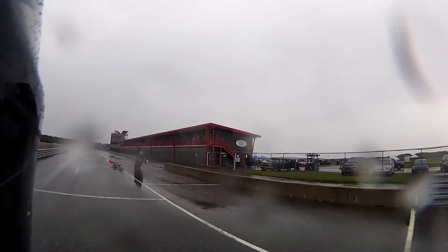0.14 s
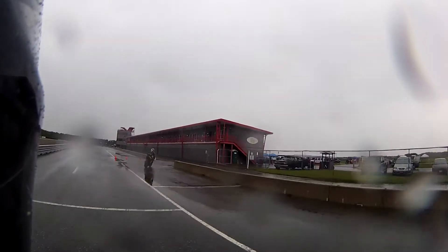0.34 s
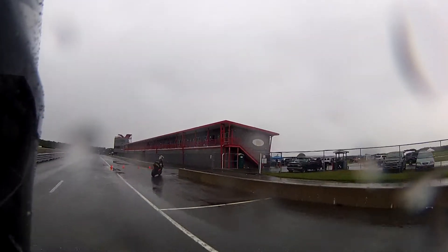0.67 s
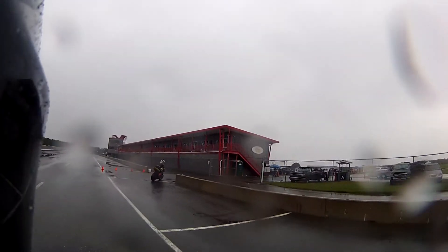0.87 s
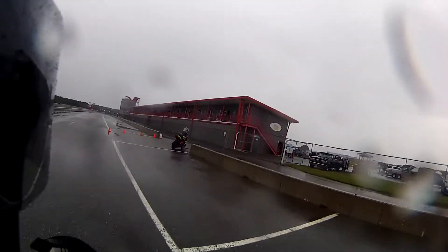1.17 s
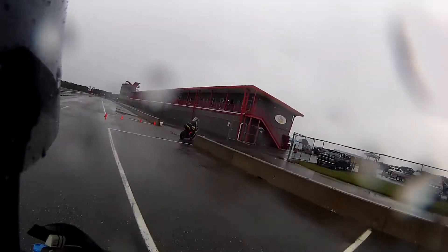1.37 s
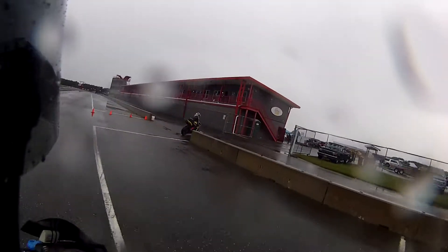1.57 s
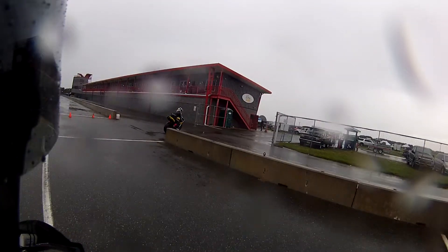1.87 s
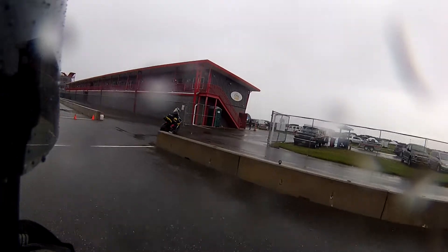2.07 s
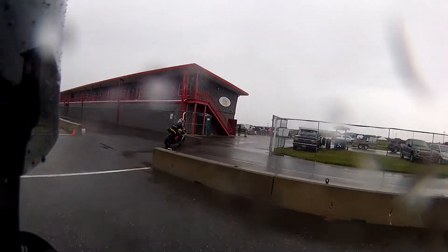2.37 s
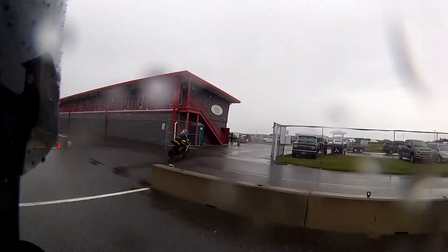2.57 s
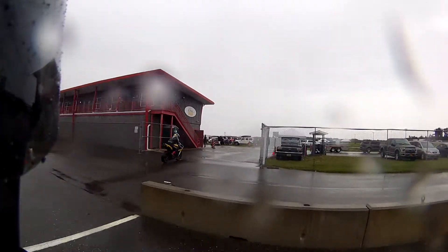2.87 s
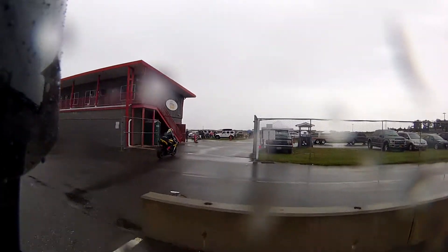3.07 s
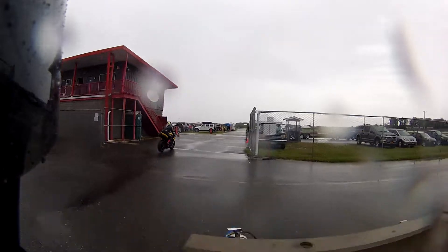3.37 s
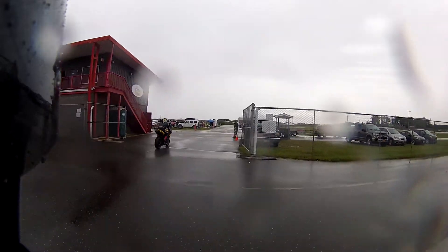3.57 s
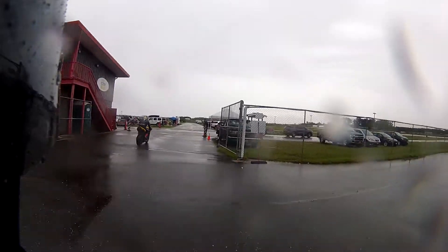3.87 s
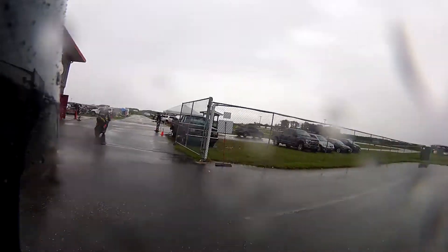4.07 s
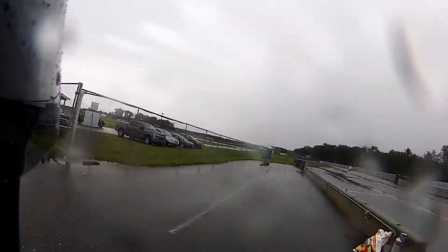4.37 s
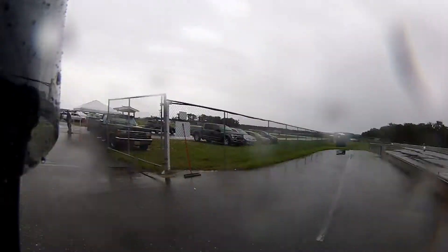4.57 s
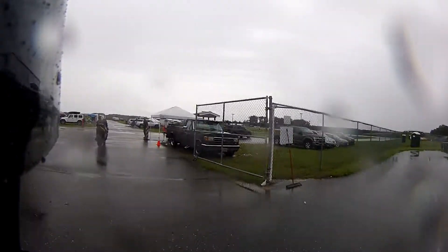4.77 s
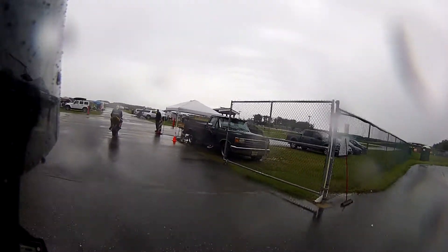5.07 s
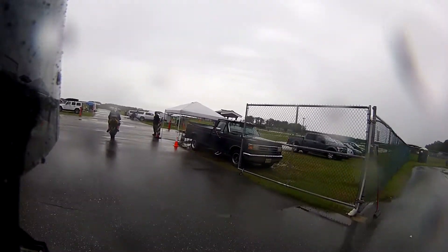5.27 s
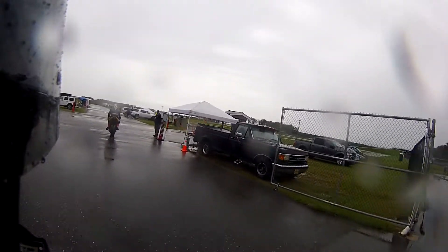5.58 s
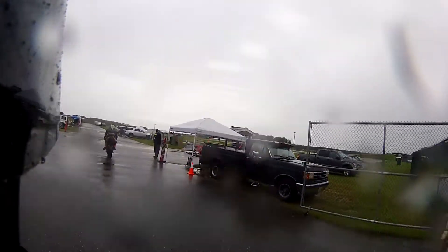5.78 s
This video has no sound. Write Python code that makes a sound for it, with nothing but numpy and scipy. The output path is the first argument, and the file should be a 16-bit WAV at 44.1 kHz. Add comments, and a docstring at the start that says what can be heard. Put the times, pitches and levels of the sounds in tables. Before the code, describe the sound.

A motorcycle engine, heard from on the bike, runs down on a closed throttle as it leaves a wet track. The exhaust pops, gives one loud backfire and crackles briefly, with a faint gear whine behind. The revs sink, two quick throttle blips follow, and the engine then pulls gently at low speed. Light mechanical clatter, wet tyre hiss and a little wind on the microphone lie underneath.

```python
"""A motorcycle engine, heard from on the bike, runs down on a closed throttle as it rolls off a wet track.
Each firing sends a gas pulse through the pipe; the engine is blipped twice and then pulls gently.
Unburnt fuel pops and cracks in the exhaust; gear whines and a late exhaust harmonic are sines locked
to the firings. Valve clatter, ticks of grit, tyre hiss and a little wind, mostly filtered noise, lie under."""
import sys
import numpy as np
from scipy import signal
from scipy.fft import rfft, irfft
from scipy.io import wavfile

SR = 44100
rng = np.random.default_rng(int(sys.argv[2]) if len(sys.argv) > 2 else 0)


def unload_wav(signal):
    """Save mono or channel-first audio to the path in sys.argv[1] as 16-bit WAV at rate SR, clipped to [-1, 1]."""
    wavfile.write(
        sys.argv[1],
        SR,
        np.round(np.clip(np.atleast_2d(signal).T, -1, 1) * 32767).astype(np.int16),
    )


N = 261940
TIME = np.arange(N) / SR
CUTOFF_HZ = 12900
CRUISE_HZ = 60  # firing rate that counts as cruising

# Engine running down in gear, dropping with the clutch in, then following the throttle:
# (time [s], firing rate [Hz])
FIRING_RATE = [(0, 89.52), (.75, 80.32), (1.05, 75.54), (2.42, 57.87), (2.8, 41.03), (2.97, 62),
               (3.05, 63.47), (3.18, 104.1), (3.45, 74.32), (3.8, 46.88), (4.01, 61.5), (4.16, 65.43),
               (4.37, 60.24), (4.75, 63.95), (4.93, 61.72), (5.06, 66.06), (5.27, 62.2), (5.43, 66.2),
               (5.65, 53.1), (5.94, 46.55)]
# Twists of the throttle, two blips and then gentle pulls: (time [s], attack [s], hold [s], release [s],
# thump level before trim [dB], hard edge level at cruising revs before trim [dB])
THROTTLE_TWISTS = [(2.869, .025, 0.088, 0.022, -50, -56.5), (3.057, 0.042, 0.068, 0.04, -44, -51.5),
                   (3.797, 0.025, .25, 0.33, -52, -61), (4.376, 0.24, 0.1, 0.29, -56, -53.5),
                   (5.021, .05, 0.041, 0.089, -53.5, -63), (5.248, 0.092, .08, 0.028, -53.5, -60.5)]
# Tone of the hard edge on a shut throttle: (frequency [Hz], relative level per Hz [dB])
SHUT_EDGE_SPECTRUM = [(60, -40), (200, -14), (340, 7.5), (430, 1), (510, 3.5), (590, 8), (700, -16),
                      (800, -7.5), (880, -17), (980, -10.5), (1200, -22), (1500, -63), (4000, -79)]
# Hiss and clatter swell with the big blip; clatter alone swells again during the pull:
# (time [s], attack [s], hold [s], release [s], clatter level [dB], hiss level [dB])
NOISE_SWELLS = [(3.07, 0.058, 0.23, 0.24, -66, -69), (4.7, .3, 0.018, 0.81, -64, -95)]


def amp(db):
    """Decibels to gain."""
    return 10 ** (np.asarray(db) / 20)


def unit(x):
    """Scales to rms 1."""
    return x / np.sqrt(np.mean(x ** 2) + 1e-20)


def curve(rows, axis=1):
    """One column of a time table, at every sample."""
    rows = np.asarray(rows)
    return np.interp(TIME, rows[:, 0], rows[:, axis])


def swell(s, attack_s, hold_s, release_s, db=0):
    """Envelope that rises, holds at db and dies away."""
    t = TIME - s
    rise = np.clip(t / attack_s, 0, 1)
    fall = np.exp(-np.maximum(t - attack_s - hold_s, 0) / release_s)
    return amp(db) * rise * fall


def together(*levels):
    """Levels add by their power."""
    return np.sqrt(sum(level ** 2 for level in levels))


def wander(rate_hz):
    """Slow random motion of rms 1."""
    hz = np.fft.rfftfreq(N, 1 / SR)
    slow = rfft(rng.standard_normal(N)) * np.exp(-(hz / rate_hz) ** 2)
    return unit(irfft(slow, N))


def colour(x, spectrum):
    """Causal filter with the given spectrum: rings after a click, never before."""
    hz, db = np.transpose(spectrum)
    grid = np.fft.rfftfreq(4096, 1 / SR)
    level_db = np.interp(np.log(grid + 1), np.log(hz), db)
    # folding the cepstrum gives minimum phase
    cepstrum = irfft(np.log(amp(level_db)))
    half = len(cepstrum) // 2
    cepstrum[1:half] *= 2
    cepstrum[half + 1:] = 0
    response = irfft(np.exp(rfft(cepstrum)))
    return signal.oaconvolve(x, response)[:len(x)]


def noise(spectrum):
    """Coloured noise of rms 1."""
    return unit(colour(rng.standard_normal(N), spectrum))


def add(mix, s, sound):
    """Mixes a sound in at time s."""
    part = mix[round(s * SR):][:len(sound)]
    part += sound[:len(part)]


def exhaust(turns, thump_db=-1, shut_db=-0.5, open_db=-3.5, edge_uneven_db=2.3, limp=0.037,
            rush_db=-15, rasp_db=-13, shut_rasp_db=-3):
    """One gas pulse per firing with a rush behind it; the burn is ragged on a shut throttle and near idle."""
    # tones: (frequency [Hz], relative level per Hz [dB])
    thump_spectrum = [(30, -26), (100, 0), (150, 4), (190, 8), (240, 1.5), (320, 4.5), (420, 6.5),
                      (700, -9), (3000, -45.5)]
    open_edge_spectrum = [(60, -74.5), (200, 7.5), (340, 5), (400, 7.5), (490, 1.5), (560, 8), (660, 1),
                          (800, 4.5), (880, -12), (980, -14.5), (1180, -18.5), (1400, -20.5), (2000, -26),
                          (4000, -42)]
    # ragged burn on the shut throttle, sputtering out after the big backfire:
    # (time [s], thump level before trim [dB], edge level before trim [dB])
    ragged_burn = [(0, -42, -49.5), (.55, -43.5, -49.5), (.9, -42, -54), (1.04, -53.5, -54),
                   (1.4, -57, -69.5), (1.53, -52, -57.5), (1.7, -66, -86), (2.0, -78, -67),
                   (2.25, -80, -87)]

    at = np.flatnonzero(np.diff(np.floor(turns)))
    size, edge, late = rng.standard_normal((3, len(at)))
    ragged = (1 - .85 * throttle()[at]) * (1 + 2.5 * np.maximum(-revs()[at], 0))
    size_db = 1.8 * ragged * size
    late_s = .0004 * ragged * late
    # every other firing is a little stronger; the root evens out the power as the rate changes
    strength = amp(size_db) * (1 + limp * (-1) ** np.arange(len(at))) / np.sqrt(curve(FIRING_RATE)[at])
    at = np.clip(at + (late_s * SR).astype(int), 0, N - 1)
    soft, hard = np.zeros((2, N))
    soft[at] = strength
    hard[at] = strength * amp(edge_uneven_db * ragged * edge)

    rush = unit(np.exp(-(turns % 1) / 3.0) * rng.standard_normal(N))  # decays after each firing
    # suction follows each front
    slugs = -pipe(unit(soft) + amp(rush_db) * rush, width_s=0.0012, echo=0.037, lag_s=0.0019)
    push, bite = effort()
    thump_level = amp(thump_db) * together(push, amp(curve(ragged_burn)))
    thump = unit(colour(slugs, thump_spectrum)) * thump_level
    shut_level = amp(curve(ragged_burn, axis=2) + shut_db)
    shut = shut_level * unit(colour(unit(hard) + amp(shut_rasp_db) * rush, SHUT_EDGE_SPECTRUM))
    wide = bite * amp(open_db) * unit(colour(unit(hard) + amp(rasp_db) * rush, open_edge_spectrum))
    return thump + shut + wide


def pipe(x, width_s, echo, lag_s=0., round_trip_s=0.00469, size=1024):
    """Each gas slug leaves as a rounded pulse, and again after a round trip in the pipe."""
    t = np.arange(-size, size + 1) / SR - lag_s
    first = (t / width_s) ** 2
    second = ((t - round_trip_s) / width_s) ** 2
    pulse = (1 - first) * np.exp(-first / 2) + echo * (1 - second) * np.exp(-second / 2)
    return signal.oaconvolve(x, pulse, "same")


def effort(idle_db=-62, pumping_db=-63, pumping_db_per_octave=21, idle_edge_db=-71, edge_db_per_octave=14):
    """Strength of the thump and of its edge: idling, growing with the revs, and pushed up by each twist."""
    octaves = revs()
    twists = [(swell(*shape), thump_db, edge_db) for *shape, thump_db, edge_db in THROTTLE_TWISTS]
    pumping = amp(pumping_db + pumping_db_per_octave * octaves)
    thump = together(amp(idle_db), pumping, *(grip * amp(db) for grip, db, _ in twists))
    edge = together(amp(idle_edge_db), *(grip * amp(db) for grip, _, db in twists))
    return thump, edge * amp(edge_db_per_octave * octaves)


def throttle():
    """Opening of the throttle, 0-1."""
    return np.minimum(sum(swell(*shape) for *shape, _, _ in THROTTLE_TWISTS), 1)


def revs():
    """Engine speed in octaves above cruising."""
    return np.log2(curve(FIRING_RATE) / CRUISE_HZ)


def taut():
    """1 while the drive is under load, 0 once it has gone slack."""
    # (time it starts to slacken [s], time it is loose [s])
    slackening = (0.59, 1.43)
    return np.interp(TIME, slackening, [1, 0])


def drone(turns, level_db=-62.0, db_per_octave=11, open_db=-12, taut_db=1, lag=0.12):
    """Mean flow in the pipe pulsates once per firing; stronger off the throttle, lumpy on a slack drive."""
    load = taut()
    flow = -np.cos(2 * np.pi * (turns - lag) + .2 * wander(20))
    waver_db = (3.2 - 2.2 * load) * wander(12)
    return unit(flow) * amp(level_db + db_per_octave * revs() + open_db * throttle() + taut_db * load + waver_db)


def afterfire(bang_decay_s=0.0032, bang_db=-6, crack_db=-6, thud_db=-1,
              boom=0.31, boom_hz=75, boom_decay_s=0.0084, front_db=13,
              knock_db=-9, knock_hz=135, knock_decay_s=0.024):
    """Unburnt fuel goes off in the hot pipe: a round thud with a steep front and a crack on top."""
    # afterfire pops: (time [s], thud pulse level [dB], crack level before trim [dB])
    pops = [(0.1204, -31, -63), (0.426, -31.5, -54), (0.5312, -26.5, -56), (.642, -25.5, -49),
            (0.822, -44, -51), (0.87, -28, -46), (.897, -31, -44.5), (0.9577, -10.5, -17.5),
            (0.9734, -28, -37.5), (0.988, -33, -44), (1.014, -34.5, -43.5), (1.987, -46.5, -76),
            (2.938, -44.5, -66)]
    # sharp cracks in the silencer:
    # (time [s], crack level before trim [dB], decay [s], thud level before trim [dB])
    silencer_cracks = [(1.202, -35.5, 0.0077, -29.5), (1.21, -24.5, 0.003, -32),
                       (1.216, -24.5, 0.006, -32.5), (1.222, -53, 0.0045, -29), (1.2467, -18, 0.0025, -36),
                       (1.253, -45, 0.018, -35), (1.264, -37, 0.0058, -35.5), (1.317, -36, 0.0053, -38),
                       (1.324, -35, .005, -34), (1.463, -51, 0.025, -52), (1.524, -47.5, 0.0098, -41),
                       (1.566, -37.5, 0.015, -53), (1.579, -57, 0.0028, -36), (1.771, -46, 0.0042, -44.5)]
    # tones of the two: (frequency [Hz], relative level per Hz [dB])
    bang_spectrum = [(100, -9), (400, -1), (600, 12.5), (1000, -3), (1450, -6), (1720, 1), (2500, -4),
                     (2850, -20), (3300, -6.5), (3900, -28), (4500, -12), (5600, -14), (7500, -24),
                     (14000, -34)]
    crack_spectrum = [(100, 0.5), (350, -2), (600, 4), (930, -10), (1050, -0.5), (1400, -12), (1750, 2.5),
                      (2200, -10), (2550, -5.5), (2900, -17.5), (3200, -15.5), (3700, -27), (5600, -30),
                      (8000, -36), (14000, -46)]

    slugs, rattle = np.zeros((2, N))
    t = TIME[:SR // 10]
    knock = np.sin(2 * np.pi * knock_hz * t) * np.exp(-t / knock_decay_s)  # silencer shell struck from inside
    for s, db, top_db in pops:
        slugs[round(s * SR)] = amp(db)
        add(rattle, s - .001, burst(bang_spectrum, top_db + bang_db, bang_decay_s, shock=0.47))
    for s, db, decay_s, low_db in silencer_cracks:
        slugs[round(s * SR)] = amp(low_db + thud_db)
        add(rattle, s, burst(crack_spectrum, db + crack_db, decay_s))
        add(rattle, s, amp(low_db + knock_db) * knock)

    ring = np.sin(2 * np.pi * boom_hz * t) * np.exp(-t / boom_decay_s)
    # squaring lets only big ones set the silencer volume booming
    swing = boom * signal.oaconvolve(slugs ** 2 / slugs.max(), ring)[:N]
    front = amp(front_db) * colour(np.minimum(slugs, amp(-26)), SHUT_EDGE_SPECTRUM)
    return pipe(slugs, width_s=0.001, echo=0.45) + swing + front + rattle


def burst(spectrum, db, decay_s, shock=4, size=4096):
    """A shock front and dying turbulence rattle the silencer shell; db sets the energy for its decay."""
    t = np.arange(size) / SR
    turbulence = rng.standard_normal(size) * np.exp(-t / decay_s)
    sound = colour(shock * (t == 0) + turbulence, spectrum)
    return amp(db) * sound * np.sqrt(decay_s * SR / 2 / np.sum(sound ** 2))


def firing_locked_tones(turns):
    """Gear whines, then an exhaust harmonic: multiples of the firing rate, smeared and pulsed by each firing."""
    # gear and chain whines, and in the last row a high exhaust harmonic during the pull:
    # (time [s], attack [s], hold [s], release [s], multiple of the firing rate [ratio], blur [rad], level [dB])
    locked_tones = [(-.1, .1, 0.17, .25, 31, 0.93, -76), (.95, .05, .25, 0.11, 62, 1.0, -82),
                    (1.302, 0.057, .08, 0.13, 62, 0.54, -74.5), (1.45, 0.26, 0.75, .28, 62, 1.15, -77.5),
                    (1.653, 0.1, 0.49, .12, 17.6, 0.29, -72), (4.65, .3, .12, .2, 23, 1.2, -78.5)]
    flutter = (1 + .75 * np.cos(2 * np.pi * turns)) * amp(3.5 * wander(35))
    phase_wander = wander(70)
    out = np.zeros(N)
    for *shape, multiple, blur, db in locked_tones:
        tone = np.cos(2 * np.pi * multiple * turns + blur * phase_wander)
        out += unit(tone * flutter) * swell(*shape, db)
    return out


def clatter(turns, level_db=-66, db_per_octave=6, taut_db=-10,
            cases_db=-83, cases_db_per_octave=13, cases_taut_db=7, depth=0.052, flicker_db=1.0):
    """Valves and chain rattle with the firings; under load they quieten and the engine cases ring instead."""
    # tones: (frequency [Hz], relative level per Hz [dB])
    valve_spectrum = [(200, -0.5), (700, 1.5), (1000, 3.5), (1190, -6.5), (1350, 1), (1650, -3.5),
                      (1950, -8), (2300, -4.5), (3200, -4), (3600, -9.5), (3950, -7.5), (4900, -16),
                      (5800, -12.5), (7500, -25.5), (12000, -57)]
    case_spectrum = [(500, -9.5), (1500, -29), (1900, -6.5), (2130, -1), (2350, -15), (2770, -3),
                     (2940, -15.5), (3150, -3.5), (3550, -29), (3900, -19.5), (4500, -17), (5200, -17.5),
                     (9000, -27)]
    octaves, load = revs(), taut()
    beat = unit((1 + depth * np.cos(2 * np.pi * turns)) * amp(flicker_db * wander(68)))
    swells = [swell(*shape, db) for *shape, db, _ in NOISE_SWELLS]
    running = amp(level_db + db_per_octave * octaves + taut_db * load)
    valves = noise(valve_spectrum) * together(running, *swells)
    cases = noise(case_spectrum) * amp(cases_db + cases_db_per_octave * octaves + cases_taut_db * load)
    return beat * (valves + cases)


def ticks(decay_s=0.002):
    """Grit rings a thin panel for an instant: a decaying sine."""
    # small ticks of grit on the bike: (time [s], frequency [Hz], starting level [dB])
    grit = [(0.505, 2750, -62), (.797, 3800, -55)]
    out, t = np.zeros(N), TIME[:SR // 20]
    for s, hz, db in grit:
        add(out, s, amp(db) * np.sin(2 * np.pi * hz * t) * np.exp(-t / decay_s))
    return out


def air(hiss_db=-73.0, hiss_db_per_octave=4.5, hiss_taut_db=-4):
    """Hiss of wet tyres and intake, and lumpy wind on the microphone."""
    # tones: (frequency [Hz], relative level per Hz [dB])
    hiss_spectrum = [(300, -23.5), (2000, 9.5), (5800, 3), (7500, -4.5), (9300, 1.5), (11000, -4),
                     (12800, -14), (15000, 2.5)]
    wind_spectrum = [(10, -18.5), (30, -8.5), (55, -5.5), (100, -4.5), (200, -9), (400, -23), (1000, -31),
                     (3000, -53.5)]
    # wind buffets on the microphone: (time [s], attack [s], hold [s], release [s], level before lumps [dB])
    buffets = [(1.106, 0.097, 0.31, .15, -57), (4.477, 0.061, 0.11, 0.065, -50),
               (4.784, 0.06, 0.033, 0.036, -53)]
    # breeze between the buffets: (time [s], level before lumps [dB])
    breeze = [(0, -66), (.6, -56.5), (2.3, -64.5), (3.2, -56), (5.5, -57), (5.94, -59.5)]

    swells = [swell(*shape, db) for *shape, _, db in NOISE_SWELLS]
    running = amp(hiss_db + hiss_db_per_octave * revs() + hiss_taut_db * taut())
    hiss = noise(hiss_spectrum) * together(running, *swells)
    lumps_db = 2 * wander(12)
    wind = together(amp(curve(breeze)), *(swell(*gust) for gust in buffets))
    return hiss + noise(wind_spectrum) * wind * amp(lumps_db)


def scene():
    """The engine's layers follow one running count of firings; afterfire, grit and air join them."""
    unsteady = 1 + .004 * wander(15)
    turns = .9 + np.cumsum(curve(FIRING_RATE) * unsteady) / SR
    engine = exhaust(turns) + drone(turns) + firing_locked_tones(turns) + clatter(turns)
    return (engine + afterfire() + ticks() + air())[None]


def record(dry):
    """The microphone channel's band limit: a steep lowpass."""
    lowpass = signal.firwin(401, CUTOFF_HZ, window=("kaiser", 8), fs=SR)
    return signal.oaconvolve(dry, lowpass[None], "same", axes=1)


dry = scene()
out = record(dry)
unload_wav(out)
```